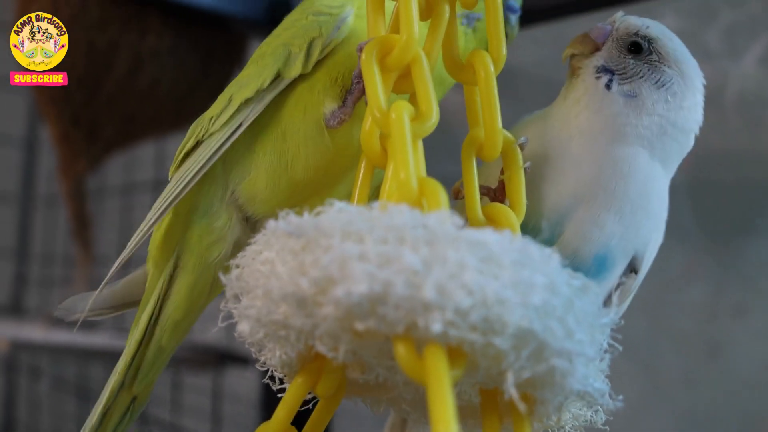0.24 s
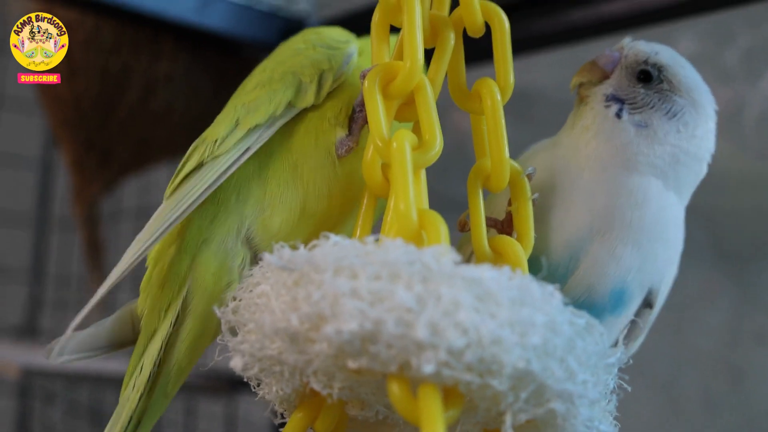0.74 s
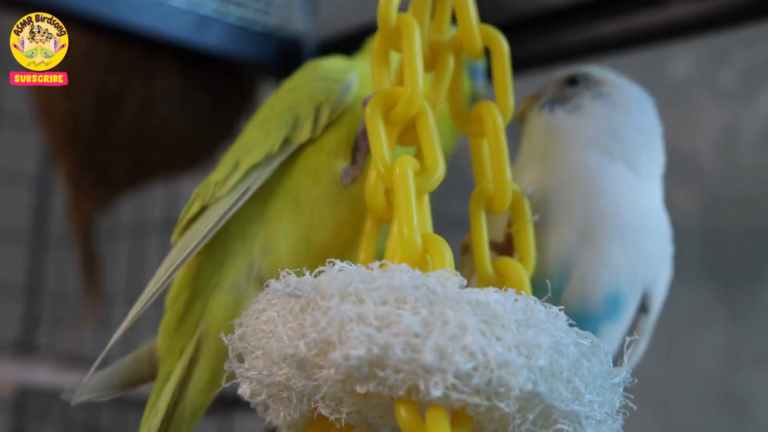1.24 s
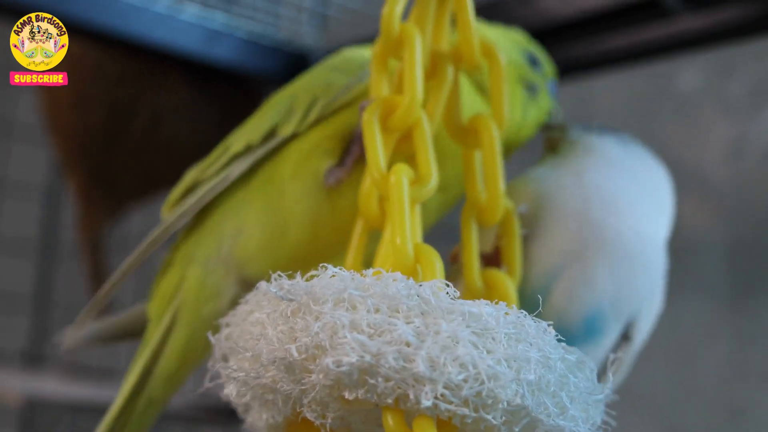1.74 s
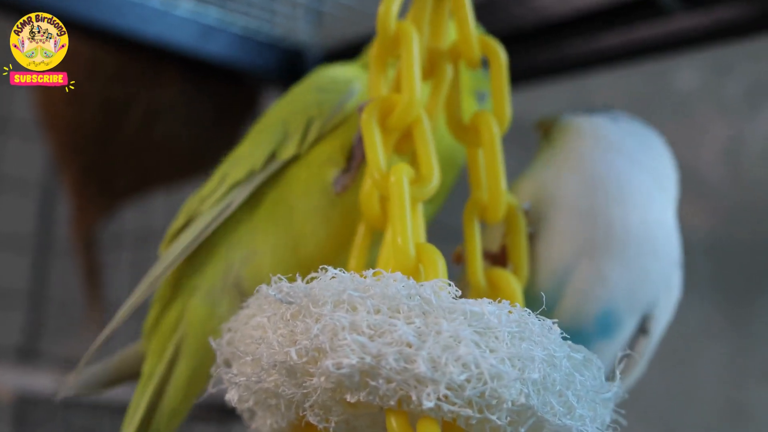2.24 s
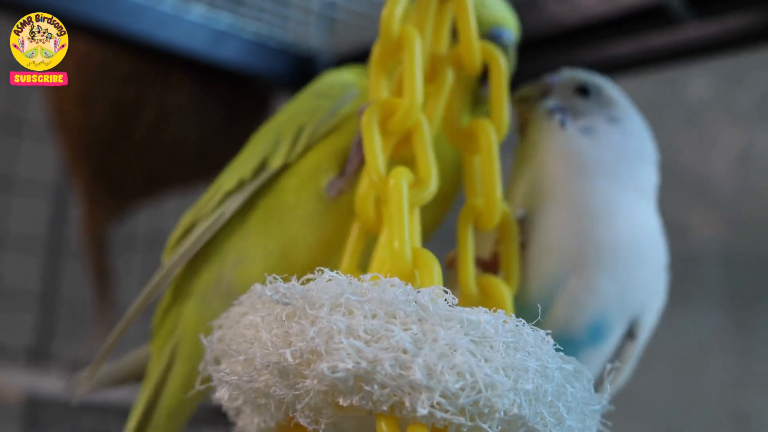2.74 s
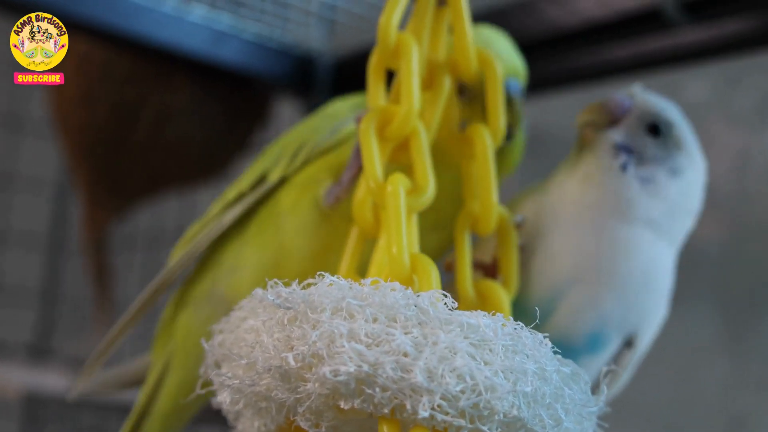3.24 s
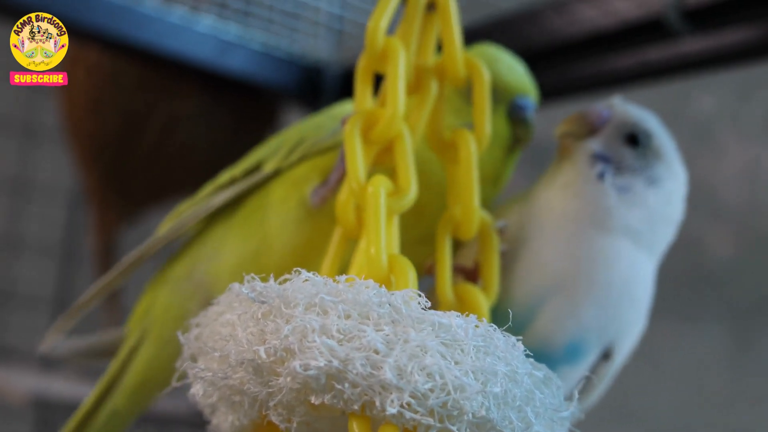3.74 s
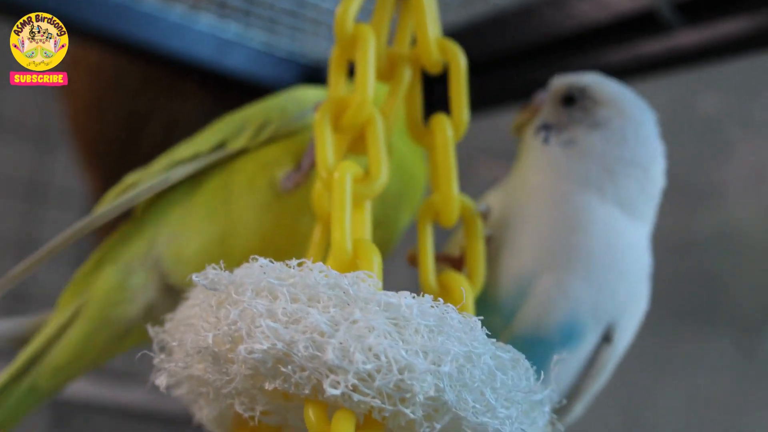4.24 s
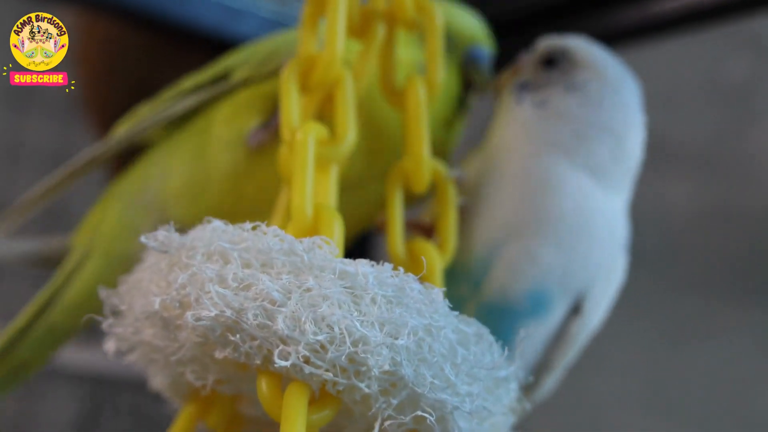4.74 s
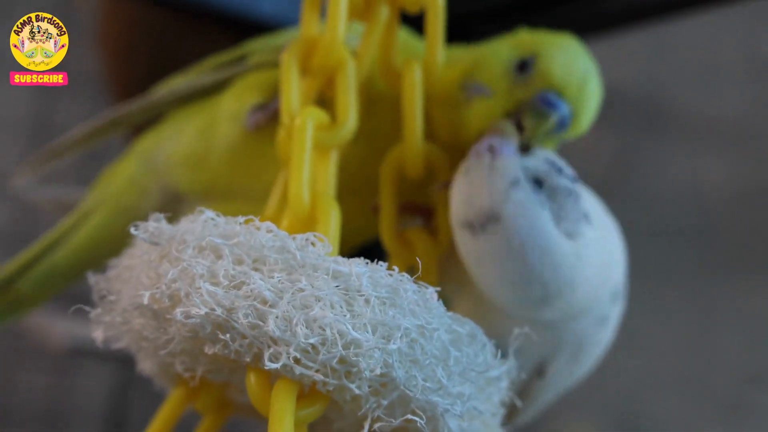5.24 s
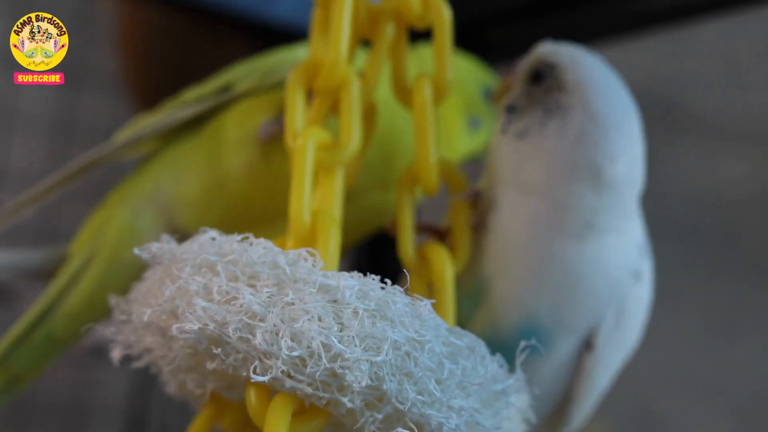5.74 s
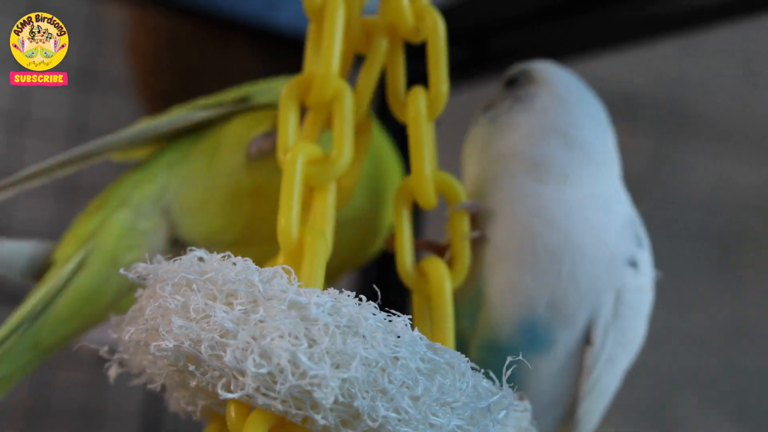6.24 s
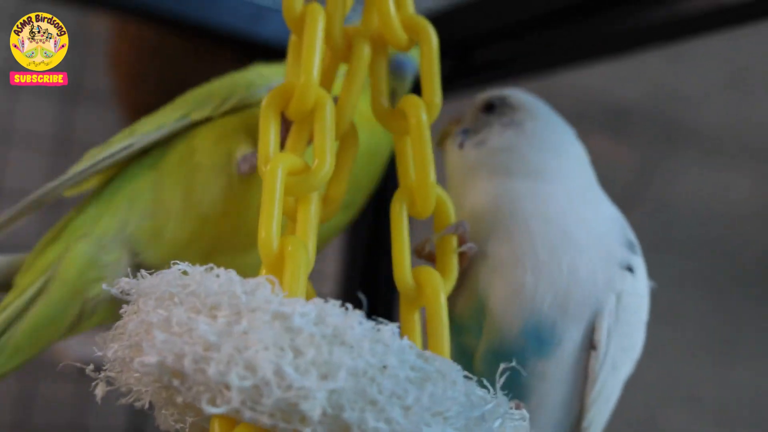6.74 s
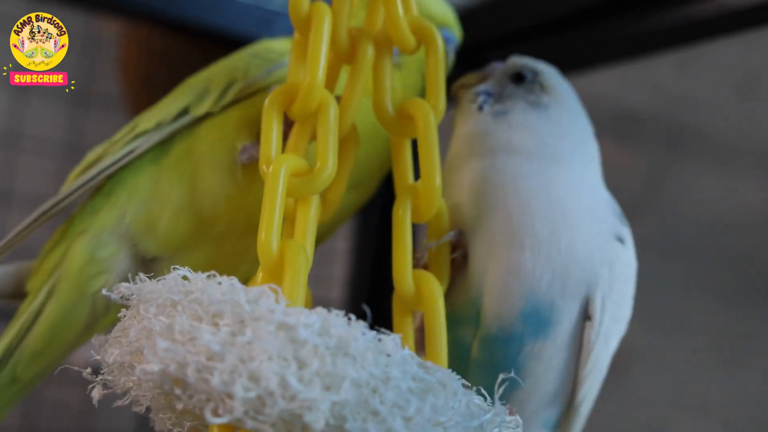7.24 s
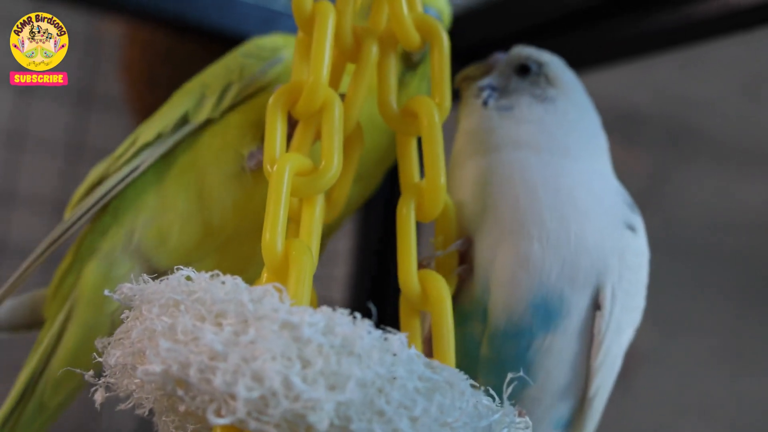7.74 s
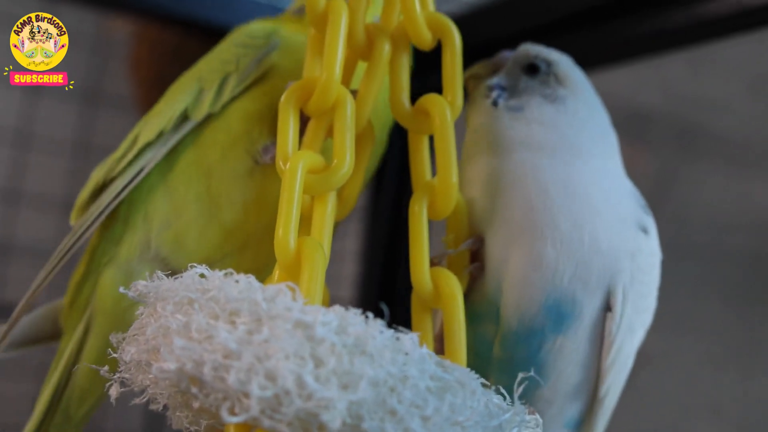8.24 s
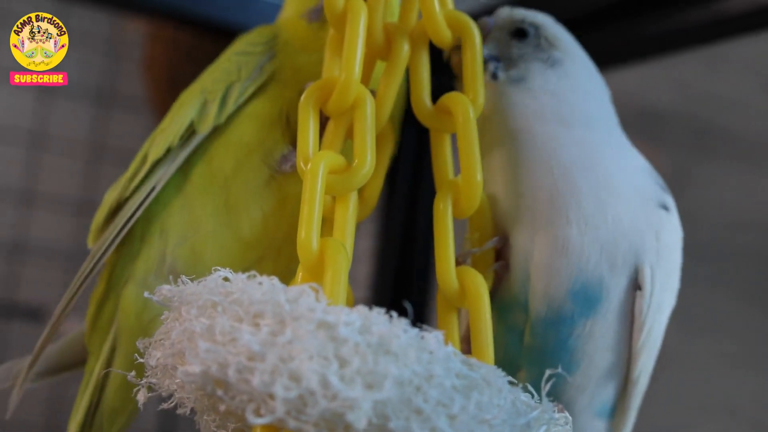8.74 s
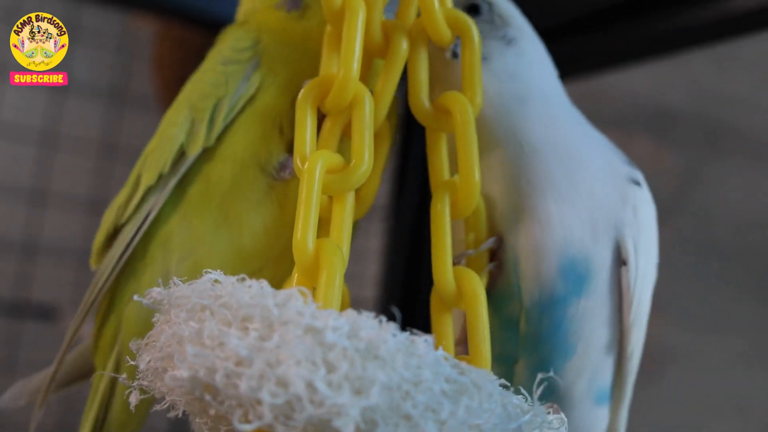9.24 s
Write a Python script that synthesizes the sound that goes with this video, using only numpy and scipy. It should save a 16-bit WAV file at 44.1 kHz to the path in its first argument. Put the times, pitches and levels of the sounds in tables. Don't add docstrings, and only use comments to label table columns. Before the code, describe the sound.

Two caged budgerigars close to the microphone in a quiet room. Rapid warbling comes in short bouts split by gaps, with crisp mouth clicks and bright ticks on a plastic chain. The song rests for about two seconds, leaving small ticks over far traffic, then returns lower and duller, as if turned away, finishing in gritty rasps and a run of hollow clicks.

```python
import sys
import numpy as np
from scipy import signal
from scipy.fft import rfft, irfft, next_fast_len
from scipy.io import wavfile
from scipy.ndimage import uniform_filter1d, map_coordinates

SR = 44100
rng = np.random.default_rng(int(sys.argv[2]) if len(sys.argv) > 2 else 0)


def how_loud(loudness_db):
    steps = np.asarray(loudness_db, float) / 20
    return 10 ** steps


def inscribe(sig):
    pcm = np.round(np.clip(np.atleast_2d(sig).T, -1, 1) * 32767)
    wavfile.write(sys.argv[1], SR, pcm.astype(np.int16))


N = 418509


def unit(x):
    return x / np.sqrt(np.mean(x ** 2) + 1e-20)


def along(points, hz):
    f, value = np.transpose(points)
    return np.interp(np.log(hz + 1), np.log(f + 1), value)


def curves(rows):
    s, *columns = np.transpose(rows)
    return [np.interp(np.arange(N) / SR, s, column) for column in columns]


def wobble(rate):
    knots = rng.standard_normal(int(N * rate / SR) + 4)
    return map_coordinates(knots, [np.arange(N) * rate / SR])


def filtered(x, response):
    m = next_fast_len(N + 8192)
    return irfft(rfft(x, m) * response(np.fft.rfftfreq(m, 1 / SR)), m)[..., :N]


def rush(spectrum):
    return unit(filtered(rng.standard_normal(N), lambda hz: how_loud(along(spectrum, hz))))


def thumps():
    # (time [s], level [dB])
    puffs = [(0.0, -41.5), (0.16, -42.5), (0.22, -49), (0.85, -45.5), (1.64, -62.5), (2.31, -50),
             (2.38, -42.5), (2.58, -58), (2.65, -35), (2.75, -48.5), (3.21, -43.5), (3.5, -61.5),
             (3.78, -46.5), (4.75, -56.5), (5.73, -42), (6.34, -46.5), (6.77, -35), (7.46, -47.5),
             (7.68, -37.5), (7.72, -30.5), (7.76, -23), (7.88, -38.5), (8.0, -45.5), (8.07, -24.5),
             (8.18, -42), (8.24, -25.5), (8.53, -48.5), (8.69, -34), (8.8, -47), (9.48, -49.2)]
    # (frequency [Hz], level per Hz [dB])
    puff_colour = [(20, -8), (70, -3.5), (97, 2), (135, -11), (300, -66.5)]
    puff_db, = curves(puffs)
    lumps = how_loud(2.8 * wobble(8))
    return how_loud(puff_db) * unit(lumps * rush(puff_colour))


def traffic_and_hiss():
    # (time [s], level [dB])
    gusts = [(0.0, -57), (1.96, -66), (3.21, -47.9), (3.53, -58.5), (3.78, -54), (4.78, -57.5), (5.32, -43),
             (5.73, -44.5), (5.83, -48.5), (6.14, -38), (6.24, -51.5), (6.59, -38), (6.67, -48),
             (6.79, -42.5), (7.08, -51), (7.77, -54), (7.85, -43), (8.0, -52), (8.1, -43.5), (8.48, -63),
             (8.97, -45.5), (9.33, -54), (9.38, -50), (9.48, -59)]
    # (frequency [Hz], level per Hz [dB])
    traffic_colour = [(60, -6.5), (180, -0.5), (600, -4.5), (1050, -2), (1400, -15), (2500, -39)]
    # (frequency [Hz], level per Hz [dB])
    hiss_colour = [(900, -10.5), (1800, 0.5), (4200, 3), (5000, -4), (9000, -5), (16000, -21)]
    gust_db, = curves(gusts)
    traffic = how_loud(gust_db + 4.5 + 1.97 * wobble(9)) * rush(traffic_colour)
    hiss = how_loud(-50.5 + 0.38 * (gust_db + 48) + 2.9 * wobble(19)) * rush(hiss_colour)
    return traffic + hiss


def throat(f):
    # (centre [Hz], width [Hz], level [dB])
    cavities = [(2170, 1220, -1.5), (3500, 1180, 0.5), (6680, 1740, -8)]
    total = 0
    for k, (centre, width, db) in enumerate(cavities):
        sign = (-1) ** k
        total = total + sign * how_loud(db) * 1j * f * width / (centre ** 2 - f ** 2 + 1j * f * width)
    return total ** 2


def warble():
    # (time [s], length [ms], start pitch [Hz], end pitch [Hz],
    # fundamental [dB], overtones above it [dB])
    first_bout = [(0.0, 73, 1297, 997, -42.0, 5.5), (0.077, 14.8, 2995, 2214, -12, -21),
                  (0.092, 8.6, 2310.0, 1530, -19.5, -21), (0.101, 61, 1503, 1153, -37, -2.5),
                  (0.159, 63, 1074, 1030, -34, -3.5), (0.227, 24, 2020.0, 1517, -29, -8),
                  (0.252, 74, 1610.0, 1220.0, -39.5, 1.0), (0.327, 6.2, 1118, 968, -33, 1.5),
                  (0.341, 18, 2520.0, 2055, -20, -23.5), (0.362, 74, 1906, 1270, -35, 1),
                  (0.815, 25, 1854, 1890.0, -38.5, 3.5), (0.845, 23, 2830.0, 2520, -17, -20.5),
                  (0.867, 24, 2550, 3140, -17, -19.5), (0.886, 22, 3310, 3346, -10, -11),
                  (0.907, 11, 3570.0, 3140.0, -23.5, -40), (0.916, 30, 1855, 2010, -26.3, 4.5),
                  (0.938, 23.4, 2170, 2863, -15, -30.5), (0.963, 10.4, 2720, 2676, -11.5, -19),
                  (1.1, 26, 2066, 2186, -23, -6), (1.125, 47, 2540, 2703, -16.5, -26),
                  (1.155, 23, 3403, 3324, -11.2, -12), (1.184, 6.6, 3180, 2380, -21, -32),
                  (1.19, 21.3, 2040.0, 1878, -23, 1), (1.208, 27, 2093, 2893, -14.9, -22),
                  (1.238, 7.7, 2940, 2560, -22, -27), (1.388, 11.3, 3200, 3175, -23, -27.5),
                  (1.4, 13.2, 3244, 1790, -23, -11.5), (1.418, 30, 2880.0, 2660.0, -12.5, -26),
                  (1.452, 50, 3330, 2803, -10.5, -33), (1.49, 7.6, 2974, 3083, -16, -14),
                  (1.498, 34, 1646, 1566, -24, 4), (1.832, 7.0, 3690, 3500.0, -24.8, -33),
                  (1.846, 16.2, 3570, 3395, -12, -26), (1.868, 8.0, 3380.0, 2907, -45, 8),
                  (1.876, 23.5, 2837, 2790.0, -21.5, 1.5), (1.901, 12.5, 2776, 3560, -24.5, -9),
                  (1.915, 8.0, 2990.0, 2595, -49, -12.5), (2.245, 17.4, 1206, 749, -32, 11),
                  (2.264, 6.8, 790.0, 1240.0, -39, 13.5), (2.272, 5.7, 1313, 1280.0, -45, 15),
                  (2.283, 89, 1130, 1203, -37, 11.5), (2.397, 10.0, 1930, 2330, -23, -9),
                  (2.407, 13.0, 2285, 1577, -30, -24.5), (2.426, 13.0, 2282, 1960, -18, -25),
                  (2.439, 22.0, 1740, 1683, -28.5, -6.5), (2.531, 22, 3060.0, 2570.0, -16.5, -1),
                  (2.55, 18.0, 3115, 3134, -14, -28.5), (2.568, 8.9, 2482, 2480, -19.5, -25),
                  (2.748, 31, 3260, 3830, -34, -22.5), (3.212, 11.2, 1920.0, 1780, -15.5, -5.5),
                  (3.229, 33, 1657, 1415, -25, -9.5), (3.265, 19, 1393, 1970.0, -26.5, -8.5),
                  (3.412, 16, 2065, 1804, -23.3, -1.5), (3.438, 26.0, 3090, 2720, -13, -11),
                  (3.464, 21.4, 3110, 3517, -8, -15), (3.486, 13.3, 3160.0, 2226, -18.5, -17.2),
                  (3.497, 14, 2280, 2036, -18.5, -14), (3.51, 22, 2307, 2556, -18, -24.3),
                  (3.531, 23, 2810, 3010, -22, -7), (3.686, 17.2, 1700.0, 1990.0, -15, -11.5),
                  (3.709, 13.0, 1600.0, 1670.0, -23.5, -8.0), (3.722, 10.8, 1560.0, 1125, -31, 7),
                  (3.73, 26.5, 1202, 949, -27.5, 0), (3.761, 28, 1099, 1312, -29.7, 5),
                  (3.816, 6.1, 2188, 2390, -7.5, -28), (3.823, 30.4, 2453, 1860, -19, -10.5),
                  (3.857, 20.0, 1358, 1836, -27, 1.5), (3.877, 27.6, 1450.0, 1494, -30, -1),
                  (3.904, 12.0, 1415, 1133, -39, 1), (3.952, 11.9, 2750, 2644, -24, -12),
                  (3.965, 13.3, 2333, 2230, -13.5, -19.5), (3.981, 16.3, 2250, 2270, -28.3, -10),
                  (3.996, 22.7, 1638, 1554, -26.5, -6), (4.017, 47, 1394, 1420, -31.5, 3.0),
                  (4.097, 17.7, 2015, 1914, -15.5, -15), (4.116, 9.4, 1983, 1307, -26, -6.5),
                  (4.124, 9.9, 1340.0, 1750.0, -32, 5), (4.132, 23, 1843, 1716, -25, -0.5),
                  (4.618, 7.4, 1933, 2450, -25.5, 2.5), (4.625, 26.0, 2330, 2217, -15.5, -14),
                  (4.651, 14.5, 1984, 2460.0, -16, -11.5), (4.666, 33.3, 2001, 1931, -25, 4.5),
                  (4.712, 7.8, 2450, 2440, -11, -10), (4.72, 15, 2040.0, 1870, -28, 20),
                  (4.734, 17.0, 1592, 1652, -46, 26)]
    # (time [s], length [ms], start pitch [Hz], end pitch [Hz],
    # fundamental [dB], overtones above it [dB])
    second_bout = [(6.832, 7.4, 791, 1026, -25, 6.5), (6.839, 42, 1142, 1040.0, -26.5, 4),
                   (6.875, 42, 1067, 1154, -23, -1.5), (6.911, 22.2, 1162, 963, -24, 1),
                   (7.031, 9.3, 1330.0, 1250.0, -29, -1.5), (7.045, 13, 1125, 1210.0, -28, 3),
                   (7.062, 12.1, 1190.0, 990.0, -25.6, 2.5), (7.073, 84, 971, 940, -28, 3.1),
                   (7.171, 35, 1762, 1370, -26, -0.5), (7.197, 34.5, 1127, 930, -24.5, -1.9),
                   (7.234, 40, 900, 1028, -27.5, 1.5), (7.302, 64.5, 1188, 1099, -25, -3.9),
                   (7.43, 21.0, 1278, 1542, -25.5, 8.5), (7.45, 5.1, 1393, 1145, -27, 9),
                   (7.457, 21, 827, 1140.0, -24.5, 0), (7.503, 7.0, 820.0, 1265, -26.5, 8),
                   (7.508, 15.8, 1177, 1317, -26, -6), (7.527, 8.9, 1030.0, 1043, -22.5, 2.2),
                   (7.537, 7.7, 953, 1458, -32, 2), (7.548, 27, 1374, 1206, -24, -8),
                   (7.577, 18, 1331, 1377, -22.5, 2.5), (7.617, 13.4, 1200.0, 1395, -29, -6),
                   (7.628, 10.0, 1421, 872, -22, 4.5), (7.636, 14, 744, 686, -30.7, 6.5),
                   (7.655, 12.0, 1340, 1389, -28.5, -0.5), (7.703, 10.4, 1670.0, 1530.0, -24.5, -23),
                   (7.803, 25.0, 1480, 1320.0, -21, 2.5), (7.828, 22, 1000.0, 682, -26.5, 5.5),
                   (7.877, 19, 1459, 1590, -26.5, -1.7), (7.989, 15.5, 1388, 1520.0, -29, -6)]
    # (time [s], roughness [0-1])
    hoarseness = [(0, .1), (.8, .3), (1.49, .2), (1.51, .5), (2.3, .1), (2.5, .6), (3.2, .15), (4.2, .3),
                  (4.6, .5), (6.85, .4), (6.9, .12), (7.35, .15), (7.45, .5)]

    pitch, first, upper = np.zeros((3, N))
    for s, ms, start_hz, end_hz, db, over_db in first_bout + second_bout:
        note = slice(round(s * SR), round((s + ms / 1000) * SR) + 40)
        length = len(pitch[note])
        pitch[note] = np.geomspace(start_hz, end_hz, length)
        swell = how_loud(-5 * np.linspace(-1, 1, length) ** 2)
        first[note] = how_loud(db + 4.0) * swell
        upper[note] = how_loud(db + over_db + 5.5) * swell

    sung = np.flatnonzero(pitch)
    pitch = uniform_filter1d(np.interp(np.arange(N), sung, pitch[sung]), size=90)
    rough, = curves(hoarseness)
    pitch *= 1 + 0.022 * wobble(110) + 0.1 * rough * wobble(450)
    phase = 2 * np.pi * np.cumsum(pitch) / SR

    shake = how_loud(1.5 * wobble(140) + 2 * rough - 11 * rough * wobble(300) ** 2)
    first, upper = shake * np.abs(uniform_filter1d([first, upper], size=130))

    order = np.arange(2, 9)[:, None]
    shape = (np.abs(throat(order * pitch)) + 0.0021) * order ** -0.4
    top_hz = np.where(np.arange(N) < 5 * SR, 9000, 4200)
    shape /= 1 + (order * pitch / top_hz) ** 6
    shape *= how_loud(3.5 * np.array([wobble(90) for _ in order]))
    overtones = np.sum(shape * np.sin(order * phase), axis=0) / np.linalg.norm(shape, axis=0)

    voice = np.sqrt(2) * (first * np.sin(phase) + upper * overtones)
    breath = unit(filtered(rng.standard_normal(N), throat))
    return voice + (0.098 + 0.31 * rough) * np.hypot(first, upper) * breath


def snaps(events, bright_db):
    out = np.zeros(N + SR)
    t = np.arange(400) / SR

    def ring(hz, t60):
        return np.sin(2 * np.pi * hz * t) * how_loud(-60 * t / t60) * (1 - np.exp(-t / 0.00029))

    for s, db, hz in events:
        luck = rng.standard_normal(4)
        body = ring(hz, 0.0052)
        body += 0.76 * ring(hz * 0.66 * (1 + 0.14 * luck[0]), 0.0044)
        body -= 0.5 * ring(min(hz * 1.472, 4300), 0.005)
        tick = ring(6100 * (1 + 0.073 * luck[1]), 0.0087)
        tick += 0.29 * ring(9000 * (1 + 0.26 * luck[2]), 0.0066)
        snap = body + how_loud(bright_db + 2 * luck[3]) * tick
        start = round((s - 0.0006) * SR)
        out[start:start + len(t)] += how_loud(db) * snap / np.abs(snap).max()
    return out[:N]


def tongue_clicks():
    # (time [s], peak level [dB], mouth resonance [Hz])
    clicks = [(0.0735, 0.3, 2930), (0.3385, -10.5, 2420), (2.1863, -15, 2750), (2.1936, -12.5, 2650),
              (2.3874, -0.5, 3620.0), (3.6753, -9.5, 3474), (3.8135, -10, 2533), (3.9294, -15, 3190.0),
              (3.9385, -13, 2900), (3.9433, -7, 2874), (4.0795, -1.5, 3320), (4.0835, -6, 2944),
              (4.0888, -10, 3310), (5.9236, -21.5, 3140), (6.8207, -18, 2020.0), (7.2855, -7.5, 2500.0),
              (7.427, -4, 2340), (7.7284, -16, 2050), (7.9066, -16, 1934), (7.9805, -16.5, 2645),
              (7.9859, -5, 2410), (8.749, -15, 1910), (8.761, -19.5, 2470), (8.841, -16, 1980),
              (8.8592, -11, 2670), (8.89, -13.5, 1770), (8.96, -22, 2930), (8.994, -21, 2100),
              (9.1418, -11, 1810), (9.1883, -17.5, 2930.0), (9.2454, -14, 1670), (9.25, -8.5, 2900),
              (9.258, -13.0, 2110), (9.264, -14, 2540), (9.2682, -17, 2010), (9.2865, -17.5, 1630),
              (9.2915, -20.4, 2020), (9.362, -24, 2210.0), (9.3666, -10.5, 1740), (9.3731, -11, 2680),
              (9.3816, -14, 2640), (9.4005, -3.5, 2740), (9.4053, -7, 2400), (9.4117, -8.5, 1770)]
    return snaps(clicks, bright_db=-20)


def beak_ticks():
    # (time [s], peak level [dB], ring [Hz])
    ticks = [(0.129, -22.0, 4400), (1.0995, -15, 2997), (1.7222, -29.3, 2484), (2.3836, -14.5, 2700.0),
             (2.6716, -1, 3200.0), (2.7185, -22, 4500.0), (2.8024, -3, 5250), (2.8564, -12, 2280.0),
             (2.9354, 1.2, 4220), (2.9641, -22, 4380.0), (2.982, -6.5, 3460), (3.0862, 1, 4600),
             (3.1263, -5.5, 3060.0), (3.3151, 1.2, 2880), (3.3429, 2, 4240), (3.665, -13, 2287),
             (3.6695, -8, 2327), (4.4964, -30.6, 4910.0), (4.5744, -27.8, 4040), (4.5922, -23, 3710.0),
             (4.9974, -25, 3050.0), (5.3254, -23, 4530.0), (5.7995, -16.5, 5070), (6.0205, -22.5, 4070),
             (6.1906, -23.5, 3300), (6.4253, -33, 3570.0), (6.4874, -19.5, 3340), (6.6648, -23, 3400)]
    return snaps(ticks, bright_db=-3)


def rasps():
    # (time [s], length [ms], rate [pulses/s], peak level [dB], fade [dB], unevenness [0-1])
    runs = [(2.1723, 10, 570, -7.5, 0.5, 0.07), (2.246, 30, 670, -23, 3, .6),
            (2.513, 11, 850, -9, -8, 0.18), (3.088, 3.6, 820, -5, -3, 0.26), (3.209, 12, 900, -4, 7.5, .6),
            (4.712, 7, 906, -8, 4.5, 0.5), (7.009, 14, 600, -7, -2, 0.29),
            (8.1505, 22.2, 760, 7.5, 17, 0.61), (8.3753, 20.4, 940, 2.5, 17.5, 0.7),
            (8.534, 15, 900, 1.5, 14, 0.58), (8.571, 16, 1150, -13, 16, 0.46),
            (9.059, 33, 990, -27, 16, 0.98)]
    pulses = np.zeros(N)
    for s, ms, rate, db, fade_db, uneven in runs:
        gap_luck, size_luck = rng.standard_normal((2, 60))
        t = np.cumsum(np.exp(0.5 * uneven * gap_luck)) / rate
        t -= t[0]
        keep = t < ms / 1000
        size = how_loud(db - fade_db * t * 1000 / ms + 6.7 * uneven * size_luck)
        pulses[np.round((s + t[keep]) * SR).astype(int)] += size[keep]
    return 9.75 * filtered(pulses, lambda f: throat(f) + 0.12 / (1 + 1j * f / 3000))


def room(x, decays):
    hz, t, z = signal.stft(rng.standard_normal(SR // 2), SR, nperseg=128)
    fade = how_loud(-60 * t / along(decays, hz)[:, None])
    tail = signal.istft(z * fade, SR, nperseg=128)[1]
    return signal.fftconvolve(np.pad(x, (60, 0)), tail / np.linalg.norm(tail))[:N]


def cage(birds):
    return how_loud(-11.5) * room(birds, [(1000, 0.06), (6000, 0.07)])


def walls(birds):
    # (frequency [Hz], t60 [s])
    wall_decay = [(1000, 0.64), (3000, 0.45), (8000, 0.36)]
    return how_loud(-16) * room(birds, wall_decay)


def stereo(mid):
    # (frequency [Hz], level against the sum [dB])
    apart = [(60, -33), (300, -35.5), (1500, -43.5), (3000, -42), (6500, -32), (9000, -8.5)]
    side = filtered(mid * wobble(150), lambda hz: how_loud(along(apart, hz)))
    return np.array([mid + side, mid - side])


def scene():
    birds = warble() + tongue_clicks() + beak_ticks() + rasps()
    birds = filtered(birds, lambda f: 1 / (1 + 1j * f / 9000) ** 2)
    return stereo(birds + cage(birds) + walls(birds) + thumps() + traffic_and_hiss())


def band_limit(x):
    return signal.sosfilt(signal.butter(12, 16960, fs=SR, output="sos"), x)


def record(dry):
    soft = dry / (1 + np.abs(dry / 0.96) ** 8) ** (1 / 8)
    return band_limit(soft)


dry = scene()
out = record(dry)
inscribe(out)
```